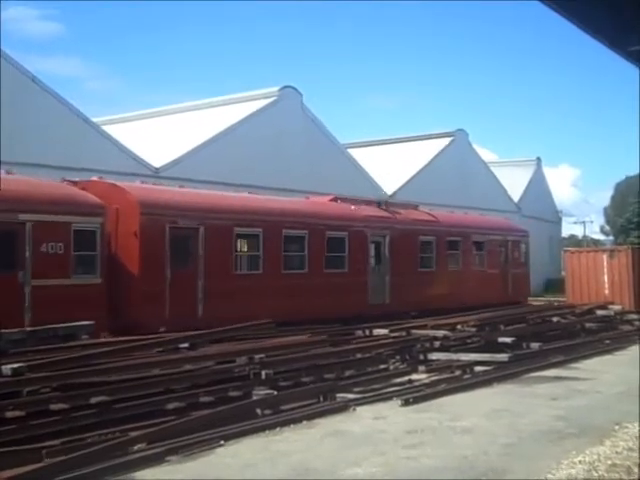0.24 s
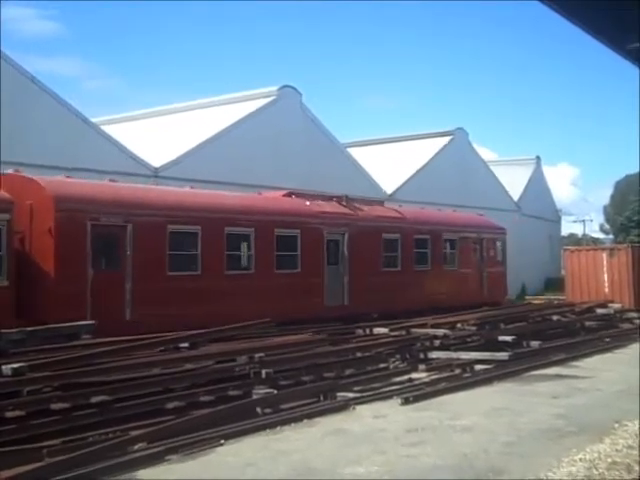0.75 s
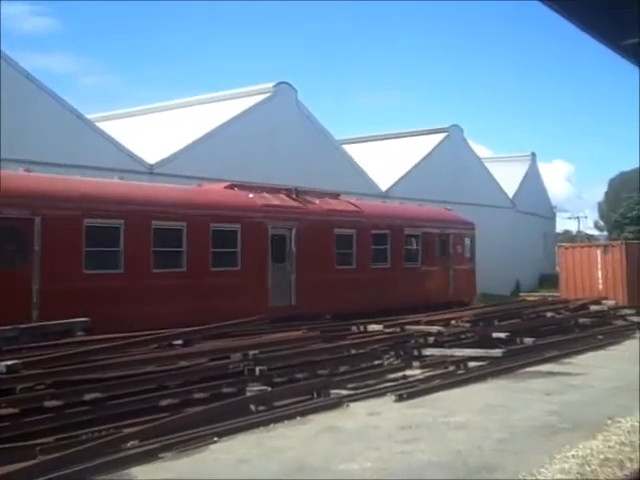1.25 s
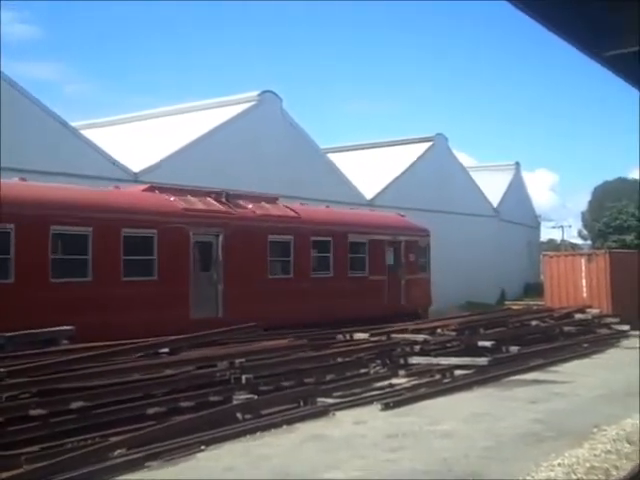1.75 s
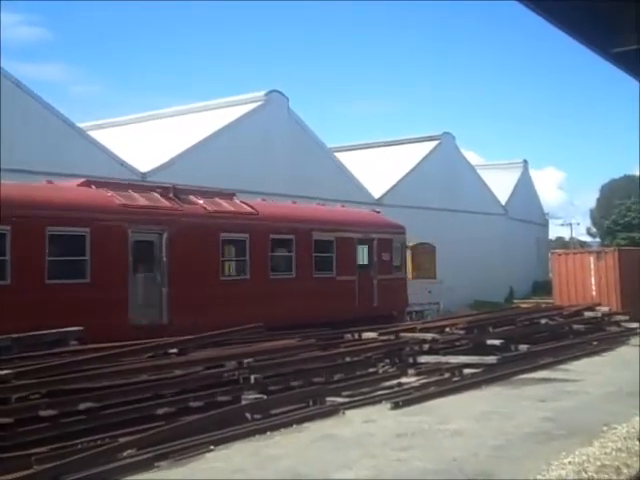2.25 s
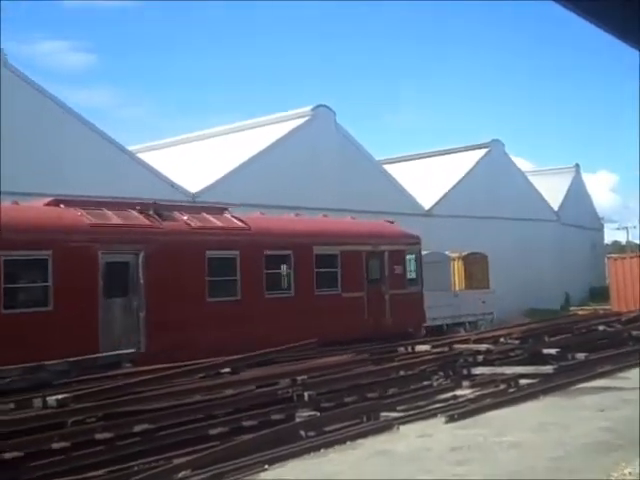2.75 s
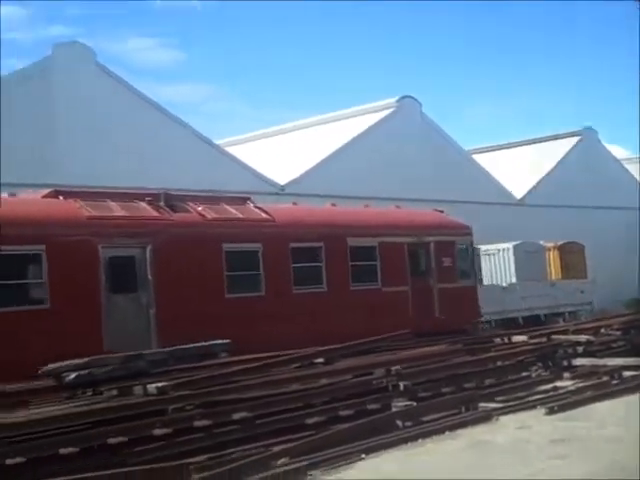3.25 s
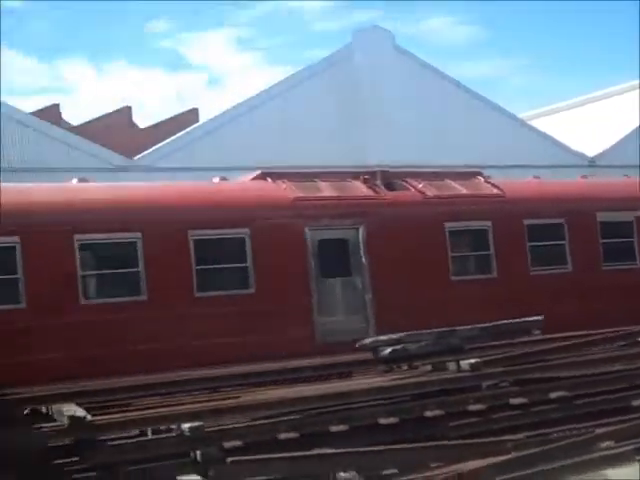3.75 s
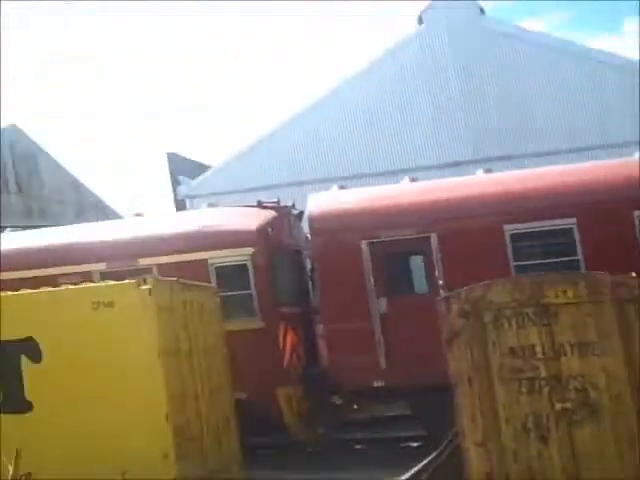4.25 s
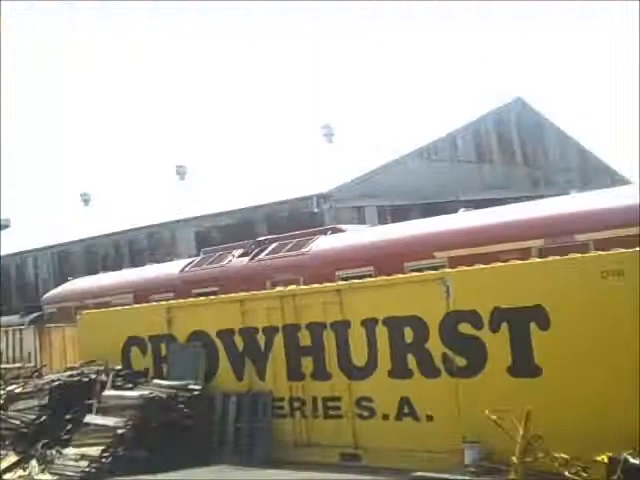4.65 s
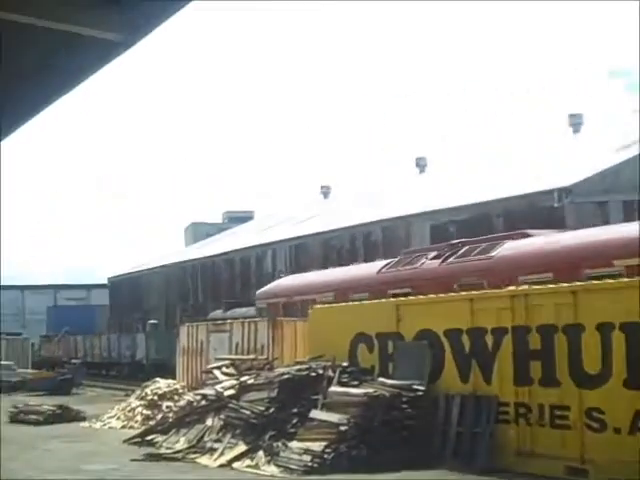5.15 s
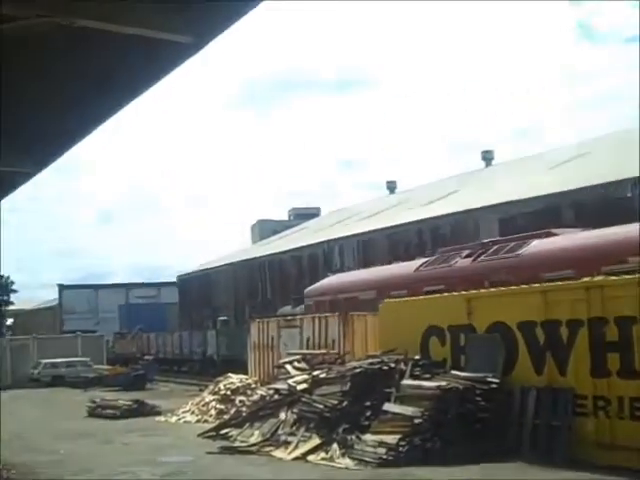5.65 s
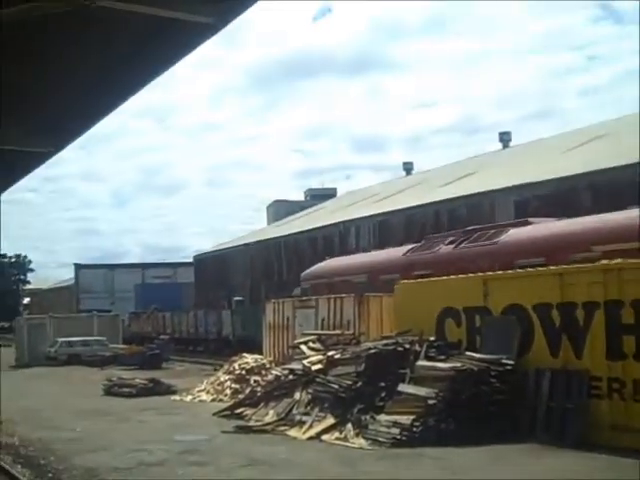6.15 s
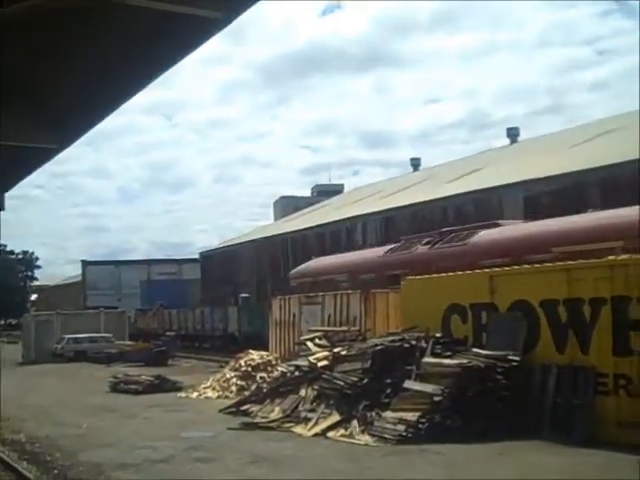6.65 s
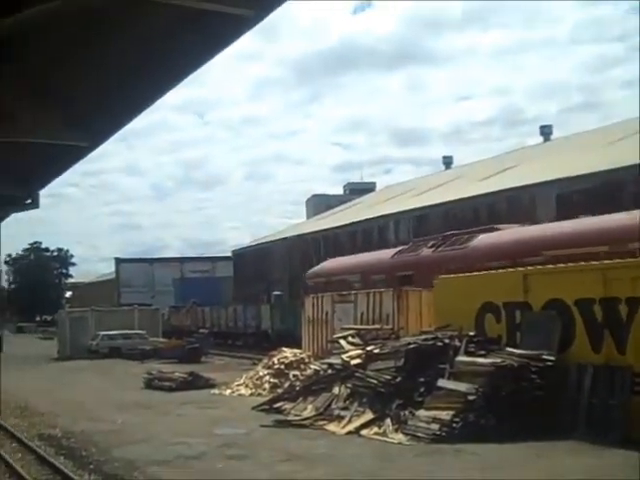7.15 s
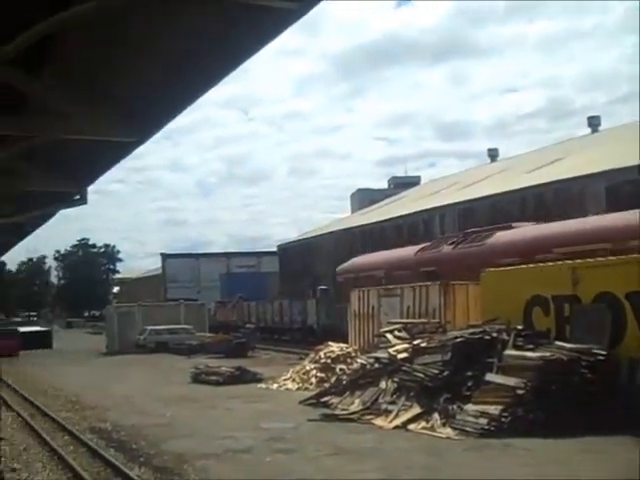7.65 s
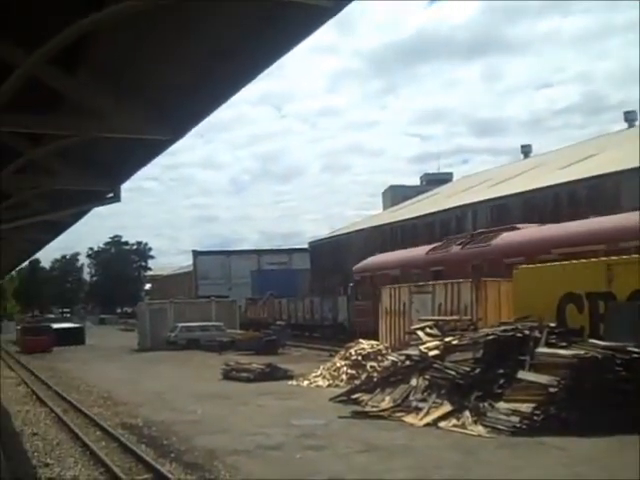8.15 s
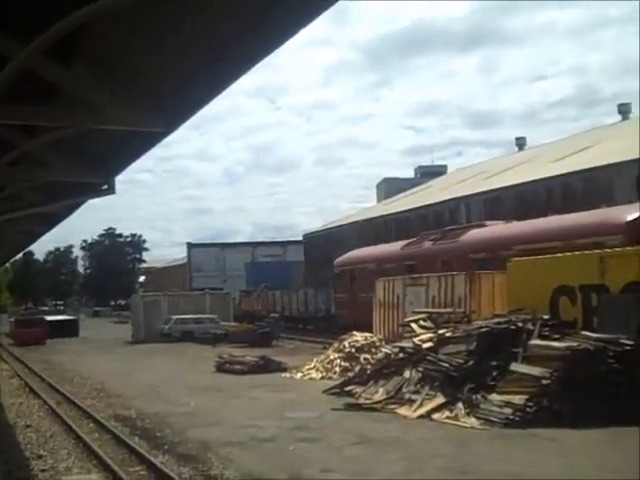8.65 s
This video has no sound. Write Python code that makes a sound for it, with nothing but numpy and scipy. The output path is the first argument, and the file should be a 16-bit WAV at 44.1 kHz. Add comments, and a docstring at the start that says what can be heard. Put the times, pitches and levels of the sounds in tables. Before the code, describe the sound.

A trackside microphone hears heavy rail wheels creeping round a tight bend. Metal scrapes on metal with wavering, rough-edged squeals at several high pitches, interrupted by brief clinks and one hard clang-like jolt. Nearby sheds return a bright tail of about a second. The screeching eases in the later part, leaving low car-body rumble, soft wheel roar and very faint yard noise.

```python
"""Railcars creep round a tight curve in a goods yard, heard in mono from beside the track.
From the start wheels roar and bodies rumble, loudest near 2 s and after 7 s, over faint yard noise.
At once flanges (wheel rims) scrape the rail, wheels squeal at their own pitches, and sheds echo the steel.
Short slips soon join in; at about 3 s a wheel jolts and rings. More scrapes and squeals follow.
From about 6 s a light scrape fades among faint slips, one last slip clinks, and the rolling goes on."""
import sys
import numpy as np
from scipy import signal
from scipy.fft import rfft, irfft, next_fast_len
from scipy.io import wavfile
from scipy.ndimage import map_coordinates

SR = 44100
rng = np.random.default_rng(int(sys.argv[2]) if len(sys.argv) > 2 else 0)


def master_out(mix):
    """Clip the mix to full scale and print it as 16-bit PCM to the path in sys.argv[1]."""
    frames = np.transpose(np.atleast_2d(mix))
    ceiling = np.clip(frames, -1, 1)
    pcm = np.round(ceiling * 32767).astype(np.int16)
    wavfile.write(sys.argv[1], SR, pcm)


N = 392490  # samples in the scene

# rolling wheels and car bodies as two bogies pass, before a fixed trim:
# (time [s], body rumble level [dB], wheel roar level [dB])
ROLL = [(0, -61, -58.5), (.9, -63.5, -54.5), (2.2, -58, -47), (3.3, -62, -56.5), (4.5, -69.5, -66.5),
        (5.9, -70, -64), (6.8, -68.5, -52), (7.45, -61.5, -46), (8.9, -62, -46.5)]
# colour of the body rumble: (frequency [Hz], level per Hz [dB])
RUMBLE = [(25, -12), (90, -20), (140, -9), (200, -1.5), (290, 3), (450, -2.5), (700, 0), (2000, -46)]
# colour of the wheel roar: (frequency [Hz], level per Hz [dB])
ROAR = [(240, -40), (400, -28.5), (474, -27.5), (553, -11.5), (597, -12), (824, -4), (1040, -8.5),
        (1500, -6.5), (1620, -5.5), (3550, -14), (4270, -11), (4690, -14), (8940, -20.5), (9960, -28.5),
        (15800, -43)]
# resonances of the rail: (frequency [Hz], width [Hz], relative level [dB])
RAIL = [(744, 65, -5.5), (834, 50, -0.5), (922, 41, -4.5), (1320, 200, -4.5), (1450, 100, -14.5),
        (2200, 330, -11.5), (4280, 250, -6.5)]
# colour of the distant yard noise: (frequency [Hz], level per Hz [dB])
AIR = [(100, -5.5), (700, 3.5), (2000, 5), (5000, 2.5), (9000, -34), (15500, -39)]

# resonances of the scraping wheels: (frequency [Hz], width [Hz], relative level [dB])
WHEEL_1 = [(1780, 33, -5), (2230, 37, -10), (2550, 64, -11), (3330, 110, -11), (3710, 58, -12),
           (4240, 66, -5), (4580, 61, -9), (5230, 140, -10), (6020, 73, 0), (6510, 32, -12),
           (6970, 150, -9), (7880, 60, -8), (8720, 110, -10), (9680, 120, -11)]
WHEEL_2 = [(2880, 49, -14), (4160, 25, -12), (4640, 42, 0), (6220, 79, -9), (6940, 68, -8), (7430, 70, -13),
           (7970, 48, -8), (8390, 29, -14), (9310, 65, -12), (10700, 35, -15), (11500, 87, -21),
           (14200, 65, -23)]
WHEEL_3 = [(3260, 41, -11), (4470, 95, -10), (5470, 67, -7), (5730, 38, 0), (6220, 39, -1), (7390, 42, -10),
           (8170, 45, -1), (9230, 66, -6), (9900, 30, -9), (11400, 30, -7), (12700, 33, -6),
           (15000, 33, -13)]
WHEEL_4 = [(4140, 28, -7), (4470, 50, -7), (5610, 34, -12), (6210, 41, 0), (7390, 110, -10), (7830, 76, -8),
           (9280, 52, -10), (10200, 40, -10), (10700, 27, -4), (11000, 38, -13), (12400, 35, -15),
           (12600, 120, -15), (14200, 69, -19), (14600, 30, -19), (15600, 85, -18)]
WHEEL_5 = [(2036, 27, -2), (2305, 25, -7), (2650, 40, -5), (3500, 20, -4), (4450, 19, -5), (4700, 17, -5),
           (5450, 30, -4.5), (6140, 70, -14), (6670, 38, -4.5), (7800, 50, -16), (8500, 30, -10),
           (14556, 30, -16)]
# colour of the grinding, before each scrape's tilt and knee: (frequency [Hz], level per Hz [dB])
GRIT = [(25, -9), (100, -8.5), (200, -9.5), (400, -6.5), (1000, -2), (2200, 3), (3300, -1), (4500, 0.5),
        (8000, 3), (9500, -2.5), (10500, -10.5), (15500, -12)]
# colour of the high fizz of a scrape: (frequency [Hz], level per Hz [dB])
FIZZ = [(7000, -12.5), (10000, 4), (11500, -1.5), (13000, -2.5), (15500, -11)]
# flange scrapes, hard or light; levels are those at the turning point:
# (start [s], turning point [s], end [s], grinding level [dB], rise up to the turning point [dB],
#  easing after it [dB/s], wheel ring relative to grinding [dB], fizz level [dB],
#  tilt [dB/octave], knee [Hz], wheel resonances [table])
SCRAPES = [ (0, 0.033, 0.78, -40.5, -4.5, 8.5, 2, -51.5, -0.8, 1600, WHEEL_1),
           (2.08, 2.5, 2.87, -38, 1, 16, -1.5, -51, 0.5, 1210, WHEEL_2),
           (3.367, 3.603, 4.24, -40.5, 5.5, 16, 0, -53, 0, 1820, WHEEL_3),
           (4.111, 4.197, 4.3, -47.5, 4, 22, -7, -50, 3, 1800, WHEEL_3),
           (4.303, 4.5, 4.93, -57.5, 3, 5, 2, -61, 6, 1820, WHEEL_3),
           (4.933, 5.156, 5.72, -40.5, 5.5, 22, 0, -45.5, -0.3, 2000, WHEEL_4),
           (5.718, 5.75, 7.5, -57.5, 0, 12.5, 3, -63.5, 5, 1850, WHEEL_5)]
# wheel modes that squeal: (start [s], let-go [s], pitch [Hz], level at the crest [dB])
SQUEALS = [ (0, .08, 6015, -33), (0, .18, 4245, -42.5), (0, .17, 1785, -48), (.4, .78, 1785, -52),
           (.8, .87, 1785, -44), (.7, .84, 4580, -50), (.6, 1.0, 9690, -55), (1.93, 2.3, 4636, -43.5),
           (2.3, 2.72, 4638, -41), (2.25, 2.8, 7972, -48), (2.68, 2.92, 6223, -46), (2.64, 2.78, 6935, -47),
           (2.58, 2.95, 10718, -52), (3.0, 3.075, 4253, -39.5), (3.4, 3.54, 2250, -55),
           (3.22, 4.15, 5724, -45.5), (3.28, 4.0, 8158, -46), (3.5, 3.6, 6218, -40),
           (3.56, 3.76, 9211, -48), (3.56, 4.05, 12699, -50), (3.8, 4.35, 11450, -52),
           (3.85, 4.3, 9895, -53), (4.11, 4.21, 3397, -49), (4.13, 4.26, 5448, -50),
           (4.16, 4.31, 14971, -49), (4.25, 4.95, 10508, -57), (4.12, 4.7, 8113, -56),
           (4.33, 4.92, 7348, -50.5), (4.33, 4.93, 4081, -54.5), (4.25, 4.92, 5609, -53),
           (4.64, 4.77, 5609, -45.5), (4.95, 5.16, 4141, -49), (5.0, 5.2, 6211, -45),
           (5.2, 5.38, 7836, -49), (4.93, 5.2, 3537, -54), (5.37, 5.46, 4145, -49),
           (5.12, 5.68, 10655, -38.5), (5.3, 5.7, 6882, -48), (5.33, 5.72, 8726, -42),
           (5.2, 6.0, 9681, -52), (5.2, 5.66, 15601, -50), (5.42, 5.68, 4608, -51), (5.35, 5.9, 14556, -58),
           (5.6, 6.25, 10655, -59), (5.7, 6.2, 4608, -58.5)]

# how long echoes last: (frequency [Hz], time to fall 60 dB [s])
SHEDS = [(200, 0.43), (2000, 1.0), (5000, 0.8), (9000, 0.62), (15000, 0.68)]

# rows of faint slips as a flange eases off: (start [s], end [s], average level [dB])
STUTTERS = [(0.449, .72, -42), (5.973, 6.36, -51.5)]
# single flange slips, level before the trim of each part:
# (time [s], length [s], level [dB], centre [Hz], spread [octaves])
SLIPS = [ (0.748, 0.0054, -35.5, 8000, 0.27), (0.808, 0.018, -39, 7500, 0.42),
         (.919, 0.0084, -38, 8950, 0.68), (.966, 0.0058, -39.5, 7650, .42),
         (1.822, 0.024, -34.5, 8500, 1.1), (1.887, 0.03, -36, 4270, .85), (1.986, .027, -37, 6460, 0.63),
         (2.914, 0.0078, -29, 8200, 0.56), (2.932, 0.02, -30.5, 8600, 0.28),
         (2.938, 0.05, -33.5, 2860, 0.52), (3.029, 0.03, -35, 8150, 0.25),
         (3.578, 0.056, -39.5, 3300, 0.66), (4.94, .01, -53, 6500, .9), (5.006, .03, -41.5, 8200, .27),
         (5.133, 0.035, -43.5, 2500, .3), (6.234, 0.011, -44, 7450, 0.79), (6.296, 0.015, -42.5, 7960, 0.8),
         (6.391, 0.011, -40.5, 7640, 0.68), (6.484, 0.0085, -37.5, 7540, 0.49),
         (7.94, .019, -39, 9000, .31)]
# wheel resonances rung by a slip: (frequency [Hz], width [Hz], relative level [dB])
SLIP_RING = [(4560, 150, 2), (5200, 71, 3.5), (6114, 120, 10), (6850, 76, 2), (7930, 81, 8),
             (8700, 250, 0.5), (9600, 59, 6.5), (11760, 110, -1), (13200, 160, -6)]

# modes of the jolted wheel: (frequency [Hz], relative level [dB], time to fall 60 dB [s])
JOLT_RING = [(1785, -15, .4), (2514, -3, .15), (3330, -8, .25), (4253, -6, .26), (5173, 1.5, .33),
             (6029, -1.5, .2), (7800, -5, .22), (8480, -6, .22), (9598, -7, .25), (10560, -15, .7)]

FIZZ_FOLLOWS, RING_FOLLOWS = 0.37, 1  # dB of fizz, and of wheel ring, per dB of pressing
GRIP_S = 0.00064  # rise time of a scrape
LET_GO_S, WHEEL_DECAY_S = 0.02, 0.19  # decay constants of friction and of wheel ring
SQUEAL_CREST = 0.41  # where a squeal peaks, as a share of its length
SQUEAL_SWELL_DB, SQUEAL_STOP_S = 3.5, 0.0054  # swell to the crest; decay constant at let-go
LINE_WIDTH_HZ, RASP_WIDTH_HZ = 23, 110  # slow flutter and faster roughness of a singing mode
STUTTER_GAP_S, STUTTER_LENGTH_S = 0.07, 0.011
STUTTER_HZ, STUTTER_OCTAVES = 8550, 0.32  # centre and spread of each faint slip
JOLT_S, JOLT_DB = 2.931, -35  # time; level before each mode's own level
TOP_HZ = 15780  # nothing is kept from here up


def amp(db):
    """Turn decibels into a gain."""
    return 10 ** (np.asarray(db) / 20)


def unit(x):
    """Scale a sound to an rms (average strength) of 1."""
    return x / np.sqrt(np.mean(np.abs(x) ** 2) + 1e-20)


def along(points, hz):
    """Read (Hz, value) points on a logarithmic frequency axis."""
    f, v = np.transpose(points)
    return np.interp(np.log(hz + 1), np.log(f + 1), v)


def curves(rows):
    """Draw each column after the time as a curve with one value per sample."""
    times, *columns = np.transpose(rows)
    return [np.interp(np.arange(N) / SR, times, column) for column in columns]


def wobble(rate, size=N):
    """Make a smooth random curve with rate random knots a second."""
    coarse = np.arange(0, size + 16, 16)  # every 16th sample is enough
    knots = rng.standard_normal(int(size * rate / SR) + 4)
    return np.interp(np.arange(size), coarse, map_coordinates(knots, [coarse * rate / SR]))


def noise(response, size=N):
    """Make noise of rms 1, coloured by a gain for each frequency."""
    m = next_fast_len(size)
    spectrum = rfft(rng.standard_normal(m)) * response(np.fft.rfftfreq(m, 1 / SR))
    return unit(irfft(spectrum, m)[:size])


def resonances(modes, hz):
    """Give the gain of a body that rings at (Hz, width Hz, dB) modes."""
    power = 0
    for centre, width, db in modes:
        power = power + (amp(db) * hz * width) ** 2 / ((centre**2 - hz**2) ** 2 + (hz * width) ** 2)
    return np.sqrt(power)


def minor_modes(hz, depth_db, spacing_hz):
    """Give a ragged gain for the crowd of weak modes of wheel, axle and rail."""
    knots = rng.standard_normal(SR // 20)
    return amp(depth_db * np.interp(hz / spacing_hz, np.arange(SR // 20), knots))


def flaring(x, depth_db, spacing_hz, life):
    """As the contact point wanders, narrow modes flare up and fade, each for about life seconds."""
    hz, t, z = signal.stft(x, SR, nperseg=2048, noverlap=1536)
    where = np.meshgrid(hz / spacing_hz, t / life, indexing="ij")
    field = map_coordinates(rng.standard_normal((1024, 64)), where, mode="wrap")
    flared = signal.istft(z * amp(depth_db * field), SR, nperseg=2048, noverlap=1536)[1]
    return unit(flared[:len(x)])


def singing(pitch_hz, size, steady=0.43, rough=0.44):
    """Sound one wheel mode at rms 1, fluttering in level and phase; friction limits its swing."""
    def swing(width_hz):
        return wobble(2 * width_hz, size) + 1j * wobble(2 * width_hz, size)

    flutter = swing(LINE_WIDTH_HZ)
    flutter = unit(flutter / (np.abs(flutter) + 1e-6) ** steady)  # evens out the level
    flutter = flutter + rough * unit(swing(RASP_WIDTH_HZ))
    return unit(np.real(flutter * np.exp(2j * np.pi * pitch_hz * np.arange(size) / SR)))


def add(track, s, sound):
    """Mix a sound into the track at time s."""
    room = track[max(0, round(s * SR)):][:len(sound)]
    room += sound[:len(room)]


def rolling(rumble_db=-1.5, roar_db=1, rail_db=-2.5, air_db=-61):
    """Wheels roar on the rail and the car bodies rumble, over the distant noise of the yard."""
    body_db, wheel_db = curves(ROLL)
    rumble = amp(body_db + rumble_db) * noise(lambda hz: amp(along(RUMBLE, hz)))
    roar = amp(roar_db + 0.39 * wobble(14)) * noise(lambda hz: amp(along(ROAR, hz)))
    rail = noise(lambda hz: resonances(RAIL, hz))
    rail = flaring(rail, depth_db=3.5, spacing_hz=90, life=0.07)
    air = noise(lambda hz: amp(along(AIR, hz)))
    return rumble + amp(wheel_db) * (roar + amp(rail_db) * rail) + amp(air_db) * air


def scrapes():
    """One flange scrape after another sounds on the curve."""
    out = np.zeros(N)
    for row in SCRAPES:
        add(out, row[0], scrape(*row))
    return out


def scrape(start, turn, end, grind_db, rise_db, easing_db_per_s, ring_db, fizz_db, tilt_db, knee_hz,
           wheel, chatter_db=1.16, minor_db=4.6, flare_db=4):
    """A flange presses on the rail and eases off: chattering friction noise, with its wheel ringing."""
    size = int((end - start + 0.34) * SR)
    t = start + np.arange(size) / SR
    press_db = np.interp(t, [start, turn, end], [-rise_db, 0, -easing_db_per_s * (end - turn)])

    def grit_gain(hz):
        shelf_db = -9 / (1 + (hz / knee_hz) ** 10)  # a wheel radiates poorly below its knee
        slope_db = tilt_db * np.log2(np.clip(hz, 1500, 12000))
        return amp(along(GRIT, hz) + shelf_db + slope_db)

    grit = flaring(noise(grit_gain, size), depth_db=minor_db, spacing_hz=65, life=0.2)
    fizz = noise(lambda hz: amp(along(FIZZ, hz)), size)
    fizz = flaring(fizz, depth_db=minor_db, spacing_hz=65, life=0.2)
    ring = noise(lambda hz: resonances(wheel, hz), size)
    ring = flaring(ring, depth_db=flare_db, spacing_hz=139.65, life=0.121)

    chatter = amp(chatter_db * (wobble(45.15, size) + 1.4 * wobble(260, size)))
    grinding = amp(grind_db + press_db) * grit
    fizzing = amp(fizz_db + FIZZ_FOLLOWS * press_db) * fizz
    friction = chatter * (grinding + fizzing)
    ringing = amp(grind_db + RING_FOLLOWS * press_db + ring_db) * ring
    after = np.maximum(t - end, 0)
    grip = np.clip((t - start) / GRIP_S, 0, 1)
    return grip * (friction * np.exp(-after / LET_GO_S) + ringing * np.exp(-after / WHEEL_DECAY_S))


def squeals():
    """Friction feeds one wheel mode: it creeps in, swells and dies when the flange lets go."""
    out = np.zeros(N)
    for start, release, pitch_hz, db in SQUEALS:
        length = release - start
        t = np.arange(int(length * SR) + SR // 8) / SR
        crest = length * SQUEAL_CREST
        swell_db = np.interp(t, [0, crest, length], [-SQUEAL_SWELL_DB, 0, -SQUEAL_SWELL_DB])
        creep_in = 1 - np.exp(-4 * t / crest)
        let_go = np.exp(-np.maximum(t - length, 0) / SQUEAL_STOP_S)
        add(out, start, amp(db + swell_db) * creep_in * let_go * singing(pitch_hz, len(t)))
    return out


def sheds(x):
    """The sheds throw sound back after 10 ms as a fading tail; each pitch range has its own fade."""
    hz, t, z = signal.stft(rng.standard_normal(SR * 3 // 2), SR, nperseg=256)
    fade_db = -60 * t / along(SHEDS, hz)[:, None]
    tail = signal.istft(z * amp(fade_db), SR, nperseg=256)[1]
    echo = np.pad(unit(tail) / np.sqrt(len(tail)), (SR // 100, 0))
    return signal.fftconvolve(x, echo)[:N]


def stutters(scatter_s=0.0087, scatter_db=2):
    """An easing flange slips faintly again and again, at an uneven pace and level."""
    rows = []
    for start, end, db in STUTTERS:
        for s in np.arange(start, end, STUTTER_GAP_S):
            when = s + rng.normal(0, scatter_s)
            level_db = db + rng.normal(0, scatter_db)
            rows.append((when, STUTTER_LENGTH_S, level_db, STUTTER_HZ, STUTTER_OCTAVES))
    return rows


def slips(ring_db=-3, rasp_db=-3, thud_db=-30):
    """The flange jumps sideways: a burst of rasp and wheel ring, with a slight thud."""
    out, size = np.zeros(N), SR // 7
    t = np.arange(size) / SR
    for s, length, db, centre_hz, spread in SLIPS + stutters():
        def band(hz):
            return np.exp(-0.25 * (np.log2((hz + 1) / centre_hz) / spread) ** 2)

        rasp = noise(lambda hz: band(hz) * minor_modes(hz, depth_db=4, spacing_hz=110), size)
        ring = noise(lambda hz: band(hz) * resonances(SLIP_RING, hz), size)
        thud = noise(lambda hz: 1 / (1 + hz / 250), size)
        rise = 1 - np.exp(-t / 0.0011)
        after = np.maximum(t - length, 0)
        friction = (amp(rasp_db) * rasp + amp(thud_db) * thud) * np.exp(-after / 0.0023)
        ringing = amp(ring_db) * ring * np.exp(-after / 0.023)
        add(out, s, amp(db) * rise * (friction + ringing))
    return out


def jolt(rise_s=0.009, hold_s=0.043):
    """A hard shove sets all the wheel's modes off together; each dies at its own speed."""
    out, t = np.zeros(N), np.arange(SR // 2) / SR
    after = np.maximum(t - hold_s, 0)
    ring = np.zeros(len(t))
    for hz, db, t60 in JOLT_RING:
        ring += amp(db - 60 * after / t60) * singing(hz, len(t), steady=0.46, rough=0.36)
    add(out, JOLT_S, amp(JOLT_DB) * (1 - np.exp(-t / rise_s)) * ring)
    return out


def scene(sheds_db=-5.0):
    """Mix the rolling with the steel sounds and their echo, the same in both channels."""
    roll = rolling()
    steel = scrapes() + squeals() + slips() + jolt()
    mono = roll + steel + amp(sheds_db) * sheds(steel)
    return np.array([mono, mono])


def record(dry):
    """Remove all frequencies from the top limit up."""
    m = next_fast_len(N + SR // 4)
    kept = np.fft.rfftfreq(m, 1 / SR) < TOP_HZ
    return irfft(rfft(dry, m) * kept, m)[:, :N]


dry = scene()
out = record(dry)
master_out(out)
```